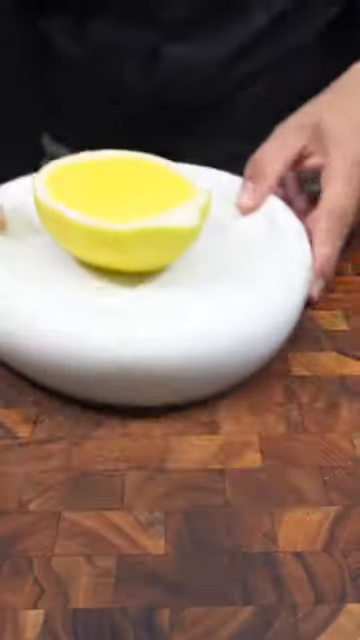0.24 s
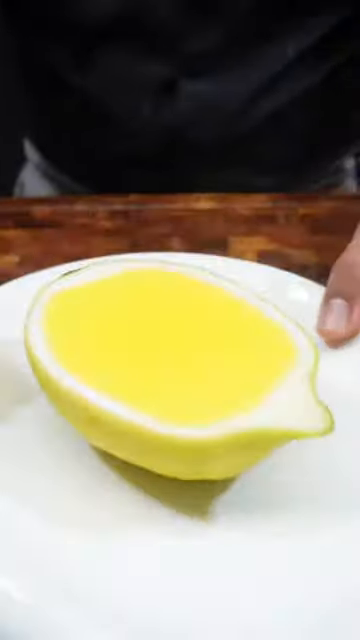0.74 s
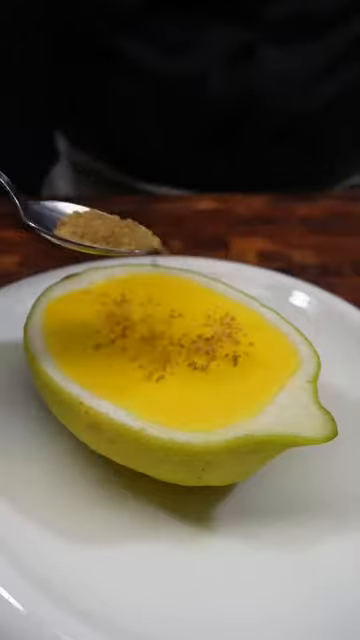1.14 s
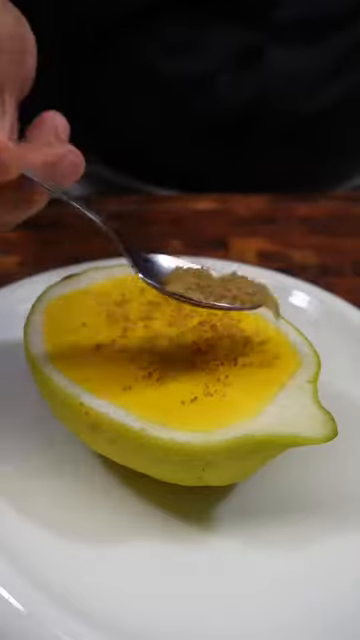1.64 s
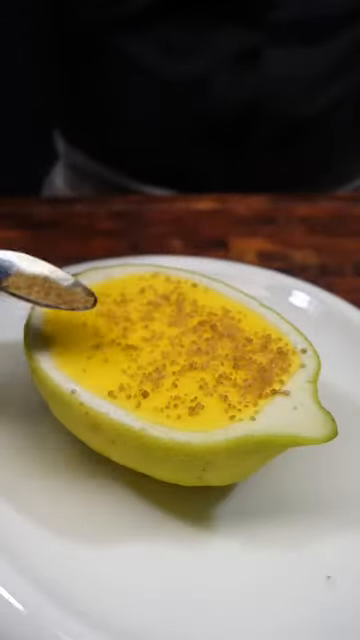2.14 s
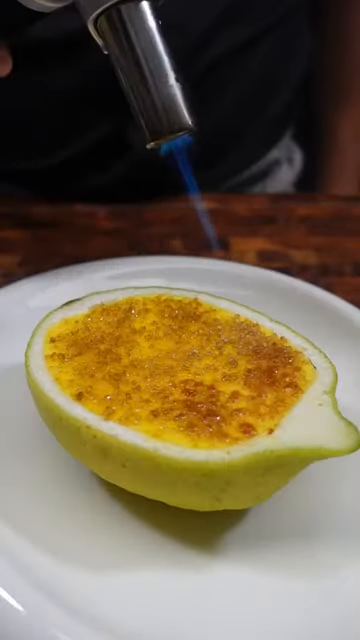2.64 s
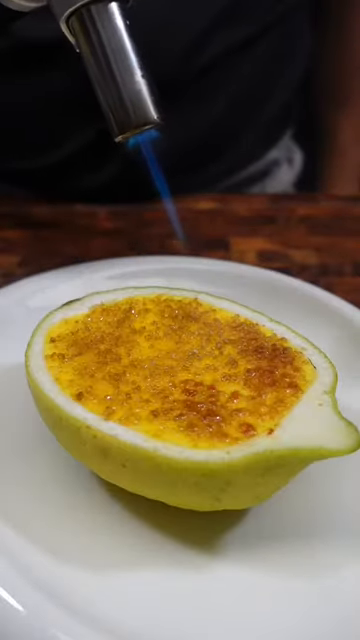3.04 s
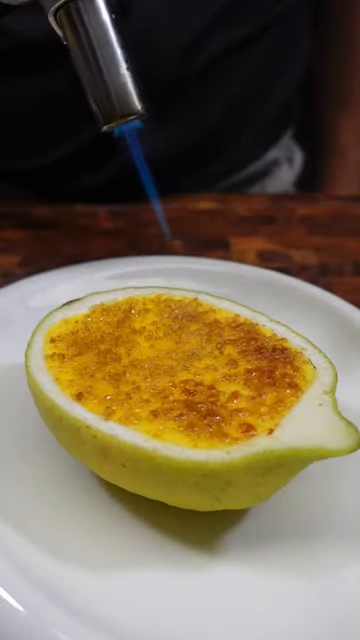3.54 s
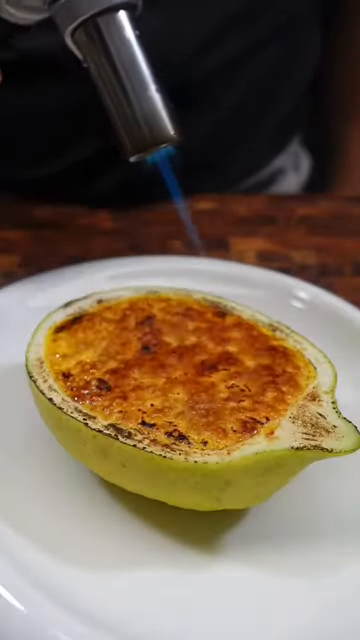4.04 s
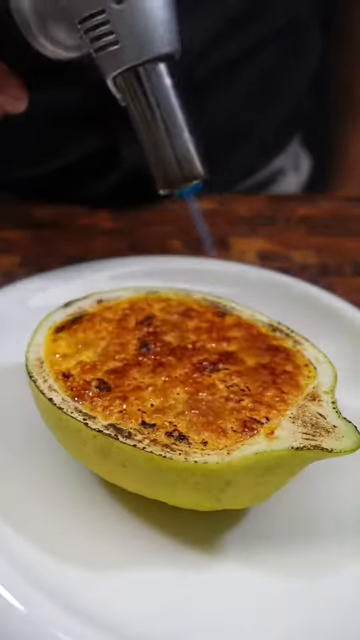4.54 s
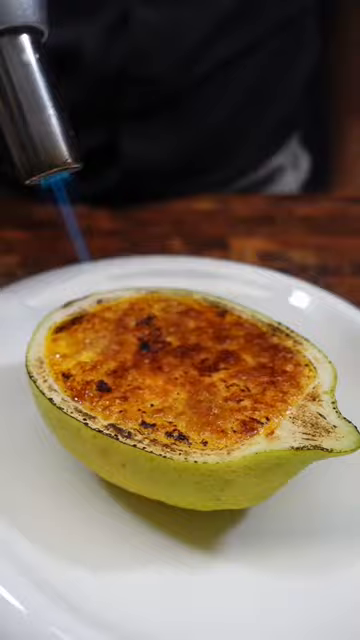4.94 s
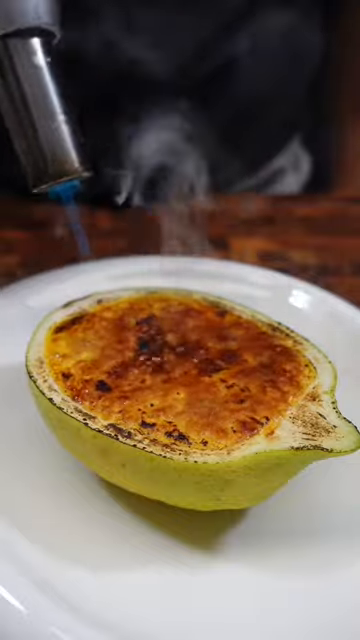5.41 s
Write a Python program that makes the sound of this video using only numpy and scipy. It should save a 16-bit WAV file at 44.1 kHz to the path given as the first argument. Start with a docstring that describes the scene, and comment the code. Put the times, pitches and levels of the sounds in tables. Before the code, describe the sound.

Ceramic plate knocks and slides over wood for under a second, then stops abruptly. Quiet kitchen air follows, with faint grains trickling from a spoon. A handheld butane torch suddenly roars, breaks for an instant and continues steadily, fluttering slightly. It then steps down to a quieter, duller flame while sugar bubbles snap and sizzle. Everything is close to the microphone, with little reverberation and identical in both ears.

```python
"""Plate, sugar and torch, kitchen worktop

Quiet kitchen, close microphone, mono: a china plate is set down and slid on a wooden board, as
modes struck by knocks and rubbed by grit. Sugar showers as tiny clicks over soft room noise and hum.
A small butane torch follows, its roar and gas hiss made of coloured noise; later the melting sugar
spits in bursts of noise. The sound passes abruptly from step to step."""
import sys
import numpy as np
from scipy import signal
from scipy.fft import rfft, irfft
from scipy.io import wavfile
from scipy.ndimage import uniform_filter1d

SR = 44100
rng = np.random.default_rng(int(sys.argv[2]) if len(sys.argv) > 2 else 0)


def log_audio(samples):
    """Write samples as a 16-bit WAV file to the path given in sys.argv[1]."""
    # one column per channel
    frames = np.atleast_2d(samples).T
    # limit to full scale, then quantise
    limited = np.clip(frames, -1, 1)
    pcm = np.round(limited * 32767).astype(np.int16)
    wavfile.write(sys.argv[1], SR, pcm)


N = 250047
TIME = np.arange(N) / SR
FREQS = np.fft.rfftfreq(N, 1 / SR)

# Levels in the tables are relative unless called otherwise.
# plate meets board: t/s, china ring level/dB, board thud level/dB, contact tick level/dB
KNOCKS = [(.1132, -12, -36, -2.5), (.129, -21, -43, -45), (.158, -21.5, -29, -45), (.176, -11.5, -33, -40),
          (.183, -22.5, -12.5, -38), (.254, -35, -19, -42), (.330, -23, -19.5, -50),
          (.396, -37, -21.5, -46), (.478, -33, -37, -38), (.592, -29.5, -19, -46)]
# modes of the china plate: f/Hz, level/dB, 60 dB decay t/s
PLATE_MODES = [(598, -8, .3), (641, 0, .5), (660, -6, .4), (798, -9, .3), (1134, -13, .25),
               (1269, -13, .25), (1590, -14, .3), (1930, -7, .22), (1985, -8, .25), (2050, -8, .25),
               (2108, -5, .3), (2554, -14, .2), (3615, -22, .25), (4416, -20, .3)]
# modes of the wooden board: f/Hz, level/dB, 60 dB decay t/s
BOARD_MODES = [(74.5, -18, .15), (156, -12.5, 0.11), (222.4, -8.5, 0.31), (317, 4, 0.1), (354.7, 3.5, 0.24),
               (397, 0, 0.12), (506, -6.5, 0.48)]
# dense clatter of weaker plate modes and room: f/Hz, level/dB
CLATTER_SPECTRUM = [(150, -14), (600, 10.5), (950, -5.5), (1350, 6.5), (1750, -9), (2300, 1.5),
                    (3400, -17.5), (4200, -51)]
# tick at the point of contact: f/Hz, level/dB
TICK_SPECTRUM = [(200, -24), (2000, 10.5), (3000, -12), (5000, -5), (8000, -23), (15000, -23)]
# plate foot scraping on the board: f/Hz, level/dB
SCRAPE_SPECTRUM = [(50, -23.5), (190, -14.5), (330, -2), (460, -11.5), (630, -11.5), (1100, -15.5),
                   (1380, -14.5), (1710, -19.5), (2200, -14.5), (2800, -20.5), (5000, -21.5), (6350, -27.5),
                   (7200, -27.5), (15000, -40.5)]
# resonances of the rubbed plate: f/Hz, half-width at -6 dB f/Hz, level/dB
RUBBED_MODES = [(2050, 150, -13), (3315, 90, -21), (3610, 80, -23), (4240, 60, -24), (4420, 60, -26),
                (4680, 55, -24), (5440, 55, -21), (6870, 110, -26), (7530, 160, -27)]
# kitchen air before the second spoonful: f/Hz, level/dB
AIR_EARLY_SPECTRUM = [(30, -34), (70, -9.5), (200, -13), (270, -4), (400, -6.5), (560, -6.5), (780, -12.5),
                      (1400, -10.5), (1800, -21), (3000, -26.5), (3800, -28.5), (8000, -31.5),
                      (15500, -35.5)]
# kitchen air after the second spoonful: f/Hz, level/dB
AIR_LATE_SPECTRUM = [(30, -28), (80, -11), (130, -9.5), (200, -5), (400, -4.5), (520, -13), (900, -8),
                     (1200, -22), (1900, -22), (2400, -28), (5500, -29.5), (15500, -34.5)]
# faint noise bands pulsing at a fast, nearly regular rate, before and after the second spoonful:
# pulse f/Hz, centre f/Hz, width f/Hz, level/dB
PULSED_BANDS = [(85, 2660, 990, -61), (52.7, 1580, 780, -61)]
# swells of a low hum: t/s, spread t/s, f/Hz, peak level/dB
HUM_SWELLS = [(.88, 0.04, 263, -46.5), (1.16, 0.04, 261, -42), (1.02, 0.088, 396, -50),
              (1.33, 0.18, 549, -51), (1.66, 0.039, 170, -49), (1.79, 0.042, 256, -45.5),
              (2.12, 0.048, 176, -47)]
# sugar leaving the spoon: t/s, spread t/s, level/dB, centre f/Hz
SPRINKLES = [(1.095, .035, -60, 7600), (1.53, .009, -54, 7800), (1.665, 0.019, -58, 4300),
             (1.99, 0.028, -63, 5000)]
# roar of the flame at full throat: f/Hz, level/dB
FLAME_FULL_SPECTRUM = [(40, -54), (60, -38), (150, -21.5), (300, -2), (450, 0), (1100, 1.5), (1850, 1),
                       (2080, -7.5), (2300, 0), (2700, -3), (3300, -12), (3750, -7.5), (4300, -17),
                       (15000, -45)]
# roar of the softer flame: f/Hz, level/dB
FLAME_SOFT_SPECTRUM = [(40, -54), (60, -62), (150, -17), (300, 0), (450, 4), (1000, 4), (1500, -1),
                       (1850, -2.5), (2080, -10.5), (2400, -5.5), (3200, -16), (3800, -14.5), (4400, -21.5),
                       (15000, -43)]
# resonances and notches of barrel and nearby space: f/Hz, width f/Hz, level over the roar/dB
BARREL_PEAKS = [(245, 30, 4), (323, 22, 6), (360, 40, -3), (490, 26, 7), (620, 22, -5), (660, 36, 5),
                (737, 22, 3), (825, 45, -5), (889, 35, 3), (952, 25, 3), (1056, 25, 3), (1116, 22, 4),
                (1667, 25, 3), (1796, 30, 4), (2265, 35, 3), (2386, 30, 3)]
# hiss of the gas orifice: f/Hz, level/dB
JET_SPECTRUM = [(1500, -36), (4300, -14), (4900, -4), (7600, -5), (8450, -11.5), (8700, 1.5), (9600, 7.5),
                (10600, 5), (10900, 0.5), (13800, -4.5), (15500, -2.5)]
# hollow in the hiss: f/Hz, width f/Hz, level/dB
JET_NOTCH = [(4400, 180, -3)]
# broad rush of gas at full throat: f/Hz, level/dB
RUSH_SPECTRUM = [(2500, -41), (4400, -1), (5000, 6.0), (7500, 2), (10000, 3.5), (15000, -33)]
# hiss as the torch is waved about at full throat: t/s, level/dB
HISS_FULL = [(2.35, -29.5), (2.376, -30.5), (3.214, -32.5), (3.244, -31), (3.414, -33.5), (3.556, -31),
             (3.626, -32.5), (3.73, -29.5)]
# hiss as the softer torch is waved about: t/s, level/dB
HISS_SOFT = [(3.77, -38), (3.9, -35.5), (4.512, -36), (4.538, -37), (4.906, -34), (4.944, -39.5),
             (5.196, -34.5), (5.354, -39), (5.66, -34.5)]
# bursting sugar bubbles: t/s, level/dB
SPITS = [(3.848, -31.5), (3.909, -29.5), (4.073, -31), (5.016, -35), (5.094, -34), (5.105, -33),
         (5.127, -30), (5.168, -24.5), (5.470, -31.5), (5.522, -35), (5.570, -33), (5.649, -40)]
# colour of spits and sizzle: f/Hz, level/dB
SPIT_SPECTRUM = [(800, -17), (2200, -7), (5000, -8.5), (7400, -4.5), (9500, -3.5), (15000, -16)]

# moments of abrupt change, t/s; the last lies past the end of the sound
SLIDE_END, SECOND_SPOON, TORCH_ON = .737, 1.552, 2.268
BREAK_START, BREAK_END, FLAME_DROP, PAST_END = 2.316, 2.341, 3.742, 6
SEATED_S = .199  # the plate comes to rest on its whole foot and is damped
# the foot brushes the board before it lands
BRUSH_S, BRUSH_DB, BRUSH_FADE_DB_PER_S = 0.014, -37.5, 167
# the push builds up, holds and brakes
PUSH_DB, PUSH_RISE_S, BRAKE_S, BRAKE_DB_PER_S = -27, 0.05, 0.57, 65
# the foot catches once on the grain
CATCH_S, CATCH_SPREAD_S, CATCH_DB = 0.481, 0.0093, 7
SING_DB = 2  # the rubbed plate over the scrape
# the full roar sags slowly; the softer one swells gently to a peak and sags again
ROAR_FULL_DB, FULL_SAG_DB_PER_S = -17, 1.05
ROAR_SOFT_DB, SOFT_PEAK_S, SOFT_SAG_DB_PER_S, SOFT_RISE_S = -20.5, 4.43, 2.4, .006
JET_FULL_DB, JET_SOFT_DB, RUSH_DB = 1, 2.5, -.5
TOP_HZ = 15800


def undb(db):
    """Decibels to gain."""
    return 10 ** (np.asarray(db) / 20)


def unit(x):
    """Scale to rms 1."""
    return x / np.sqrt(np.mean(x ** 2))


def noise():
    """White noise."""
    return rng.standard_normal(N)


def curve(rows):
    """Level column of a time table, joined by straight lines."""
    times, levels = np.transpose(rows)
    return np.interp(TIME, times, levels)


def walk(rate):
    """Random wander with a spread near 1, drawn at rate points per second and joined by lines."""
    points = rng.standard_normal(4096)
    return 1.2 * np.interp(TIME * rate, np.arange(len(points)), points)


def gate(start, end, rise_s):
    """Fades in from start and closes within the last millisecond before end."""
    opening = np.clip((TIME - start) / rise_s, 0, 1)
    closing = np.clip((end - TIME) * 1000, 0, 1)
    return opening * closing


def swell(s, spread):
    """A smooth rise and fall around time s."""
    return np.exp(-((TIME - s) / spread) ** 2 / 2)


def decay(t60):
    """Envelope that falls 60 dB in t60 seconds."""
    return np.exp(-np.log(1000) * TIME / t60)


def colour(x, points, peaks=()):
    """Filter by a spectrum with resonances on top; white noise keeps its level."""
    hz, db = np.transpose(points)
    shape_db = np.interp(np.log(FREQS + 1), np.log(hz), db)
    for centre, width, lift in peaks:
        shape_db = shape_db + lift / (1 + (2 * (FREQS - centre) / width) ** 2)
    return irfft(rfft(x) * unit(undb(shape_db)), N)


def resonate(x, hz, width):
    """Keep only one resonance of x, width Hz across at -6 dB; rms 1."""
    response = 1 / (1 + 2j * (FREQS - hz) / width) ** 2
    return unit(irfft(rfft(x) * response, N))


def grains(rate, spread_db):
    """Random tiny clicks at a mean rate per second, a few of them much stronger; rms 1."""
    struck = rng.random(N) < rate / SR
    strength_db = spread_db * rng.exponential(size=N).clip(0, 4)
    return unit(struck * noise() * undb(strength_db))


def ring(modes):
    """One-second impulse response of decaying modes with alternating signs, starting near rms 1."""
    t = TIME[:SR]
    waves = 0
    for k, (hz, db, t60) in enumerate(modes):
        waves = waves + (-1) ** k * undb(db - 60 * t / t60) * np.sin(2 * np.pi * hz * t)
    return waves / np.sqrt(sum(undb(db) ** 2 for _, db, _ in modes) / 2)


def blows(rows, axis=1):
    """One impulse per event, sized by a dB column."""
    out = np.zeros(N)
    for row in rows:
        out[int(row[0] * SR)] += undb(row[axis])
    return out


def through(x, response):
    """Play a force through an impulse response."""
    return signal.fftconvolve(x, response)[:N]


def sliding():
    """Strength of the scrape: a fading brush, then a steady push that catches once and brakes."""
    brush_db = BRUSH_DB - BRUSH_FADE_DB_PER_S * (TIME - BRUSH_S).clip(0)
    brush = undb(brush_db) * gate(0, SLIDE_END, BRUSH_S)
    brake_db = BRAKE_DB_PER_S * (TIME - BRAKE_S).clip(0)
    push = undb(PUSH_DB - brake_db + CATCH_DB * swell(CATCH_S, CATCH_SPREAD_S))
    first_knock_s = KNOCKS[0][0]
    return brush + push * gate(first_knock_s, SLIDE_END, PUSH_RISE_S)


def scrape(grit):
    """Grit rubs the foot over the end grain and sets plate resonances singing."""
    singing = 0
    # resonances swell and drift as the contact point wanders under the foot
    for hz, half_width, db in RUBBED_MODES:
        singing = singing + undb(db + 3 * walk(rate=16)) * resonate(grit, hz, 2 * half_width)
    rubbing = colour(grit, SCRAPE_SPECTRUM) + undb(SING_DB) * singing
    # a wandering time shift bends the pitch slightly
    drifting = np.interp(TIME + .00007 * walk(rate=18), TIME, rubbing)
    return drifting * sliding()


def landing(grit):
    """Knocks ring the china, thud in the board and tick at the contact."""
    hits = blows(KNOCKS, axis=1)
    # the foot chatters for a moment after each knock
    chatter = undb(-27.5) * grit * through(hits, decay(t60=0.14))
    # many weaker modes and the room blur into a dense clatter
    clatter = colour(noise(), CLATTER_SPECTRUM) * decay(t60=1.0)
    china = through(hits + chatter, ring(PLATE_MODES)) + undb(-5) * through(hits, clatter)
    china = china * undb(-4 * gate(SEATED_S, PAST_END, rise_s=0.0031))
    # the board takes each bump as a short rough push
    push = uniform_filter1d(through(blows(KNOCKS, axis=2), decay(t60=0.035)), size=300)
    wood = through(undb(-18.0) * grit * push, ring(BOARD_MODES))
    tick = colour(noise(), TICK_SPECTRUM) * decay(t60=0.017)
    return china + wood + through(blows(KNOCKS, axis=3), tick)


def plate():
    """The plate lands, rocks on its foot, and scrapes and bumps over the end grain."""
    grit = grains(rate=9000, spread_db=1.5) * undb(0.76 * walk(rate=50))
    return (scrape(grit) + landing(grit)) * gate(0, SLIDE_END, rise_s=.001)


def pulsed_band(rate_hz, centre_hz, width_hz, db):
    """A band of noise that pulses quickly at a slightly wandering rate."""
    phase = 2 * np.pi * np.cumsum(rate_hz * (1 + 0.0405 * walk(rate=6))) / SR
    band = resonate(noise(), centre_hz, width_hz)
    return undb(db) * unit(band * (1 + np.cos(phase)) ** 2)


def kitchen():
    """Soft room noise and a hum that comes and goes; a faint band of noise pulses quickly alongside."""
    later = gate(SECOND_SPOON, PAST_END, rise_s=0.0091)
    early_air = colour(noise(), AIR_EARLY_SPECTRUM) * undb(-47) + pulsed_band(*PULSED_BANDS[0])
    late_air = colour(noise(), AIR_LATE_SPECTRUM) * undb(-47.0) + pulsed_band(*PULSED_BANDS[1])
    air = early_air * (1 - later) + late_air * later
    hum = 0
    for s, spread, hz, db in HUM_SWELLS:
        phase = 2 * np.pi * hz * TIME + .5 * walk(rate=14)
        hum = hum + undb(db) * swell(s, spread) * np.sin(phase)
    return air * undb(0.64 * walk(rate=30)) + hum


def sugar():
    """Grains slide off the spoon in short faint showers of tiny clicks."""
    out = 0
    for s, spread, db, hz in SPRINKLES:
        shower = colour(grains(rate=5000, spread_db=2.6), [(hz / 2, -18), (hz, 0), (hz * 2, -18)])
        out = out + shower * undb(db) * swell(s, spread)
    return out


def roar(full, soft):
    """Turbulent burning, as unsteady noise coloured by the flame and the barrel's resonances."""
    burning = noise() * undb(0.42 * walk(rate=180))
    full_db = ROAR_FULL_DB - FULL_SAG_DB_PER_S * (TIME - TORCH_ON)
    soft_db = ROAR_SOFT_DB - SOFT_SAG_DB_PER_S * np.abs(TIME - SOFT_PEAK_S)
    full_roar = undb(full_db) * colour(burning, FLAME_FULL_SPECTRUM, BARREL_PEAKS)
    soft_roar = undb(soft_db) * colour(burning, FLAME_SOFT_SPECTRUM, BARREL_PEAKS)
    return full * full_roar + soft * soft_roar


def gas_hiss(full, soft):
    """The gas jet hisses as high noise, heard directly and off the worktop."""
    jet_level = undb(JET_FULL_DB) * full + undb(JET_SOFT_DB) * soft
    jet = colour(noise(), JET_SPECTRUM, JET_NOTCH) * jet_level
    # the full flame adds a broad rush of gas
    rush = undb(RUSH_DB) * full * colour(noise(), RUSH_SPECTRUM)
    waved_db = curve(np.vstack([HISS_FULL, HISS_SOFT]))
    hiss = (jet + rush) * undb(waved_db + .5 * walk(rate=79))
    # the bounce path changes as the hand moves, so the colour drifts
    bounce_s = .0027 + .00005 * walk(rate=3)
    return hiss + undb(-10) * np.interp(TIME - bounce_s, TIME, hiss)


def torch():
    """The flame roars in the barrel and its gas jet hisses above; both flutter together."""
    # the full flame swells in and breaks off for an instant, leaving only a faint rush
    ignition = gate(TORCH_ON, BREAK_START, rise_s=.026) ** 1.5
    faint = undb(-26) * gate(BREAK_START, BREAK_END, rise_s=.001)
    full = ignition + faint + gate(BREAK_END, FLAME_DROP, rise_s=.0015)
    soft = gate(FLAME_DROP, PAST_END, rise_s=SOFT_RISE_S)
    return undb(0.64 * walk(rate=30)) * (roar(full, soft) + gas_hiss(full, soft))


def caramel():
    """Each bursting bubble snaps and lets out a puff of steam, over a faint sizzle."""
    snap = undb(10) * decay(t60=.005)
    puff = decay(t60=.045)
    bursts = noise() * through(blows(SPITS), snap + puff)
    sizzle = undb(-48.5) * grains(rate=220, spread_db=2) * gate(FLAME_DROP, PAST_END, rise_s=0.046)
    return colour(bursts + sizzle, SPIT_SPECTRUM)


def scene():
    """All sources reach one microphone, heard alike in both ears."""
    mono = plate() + kitchen() + sugar() + torch() + caramel()
    return np.array([mono, mono])


def record(dry):
    """The loudest peaks clip and a steep low-pass cuts the top."""
    clipped = np.clip(dry, -.95, .95)
    low_pass = signal.ellip(10, .1, 80, TOP_HZ, fs=SR, output="sos")
    return signal.sosfilt(low_pass, clipped)


dry = scene()
out = record(dry)
log_audio(out)
```